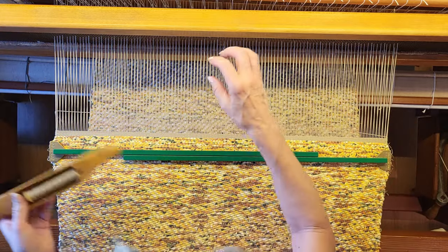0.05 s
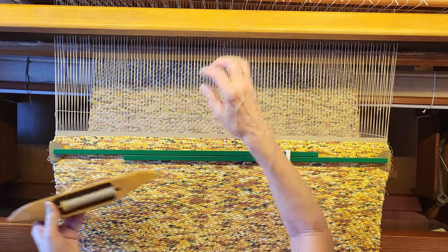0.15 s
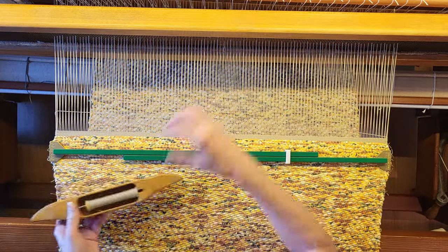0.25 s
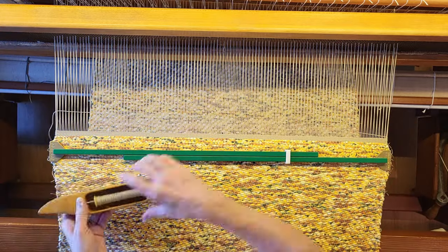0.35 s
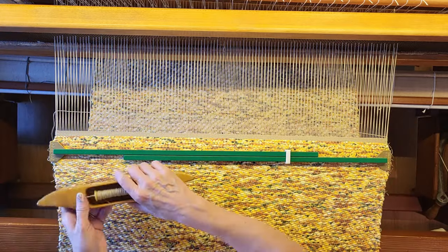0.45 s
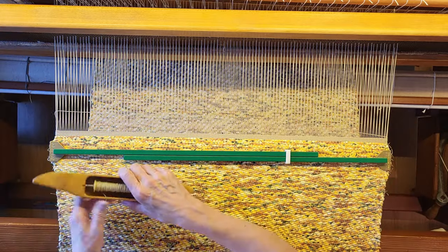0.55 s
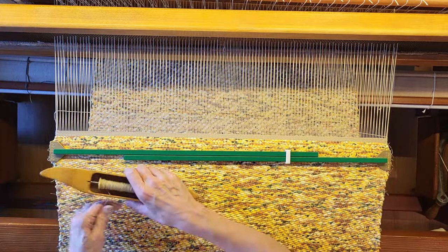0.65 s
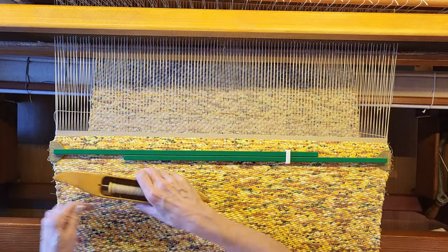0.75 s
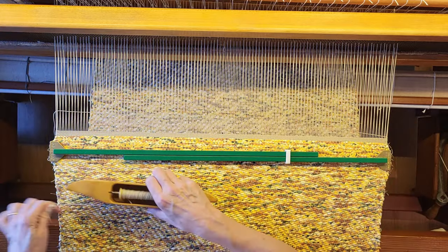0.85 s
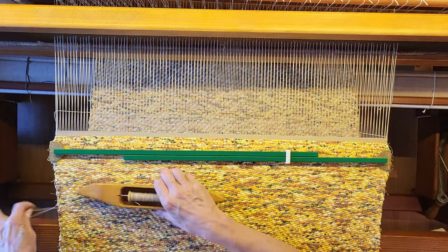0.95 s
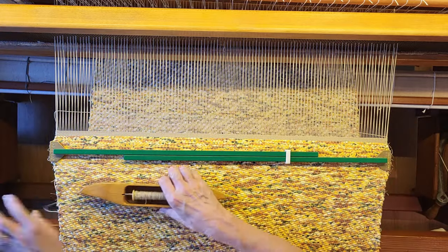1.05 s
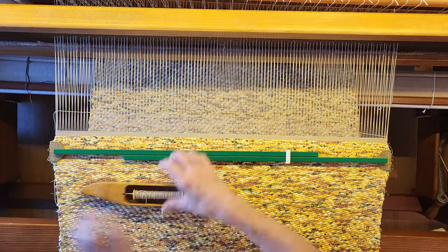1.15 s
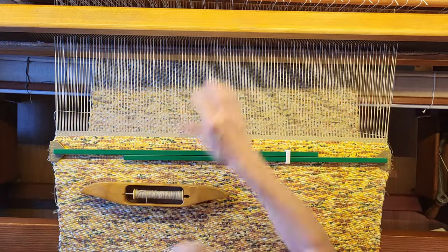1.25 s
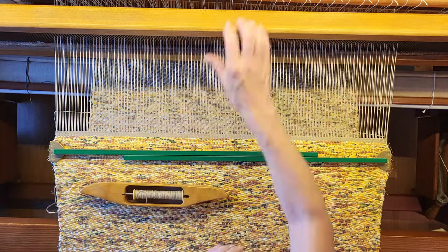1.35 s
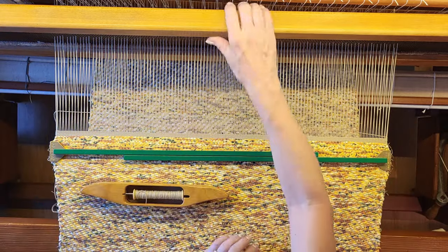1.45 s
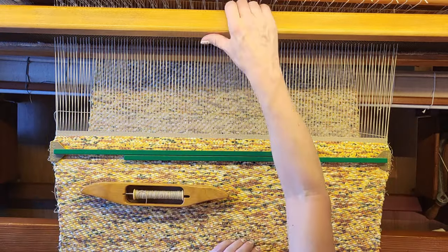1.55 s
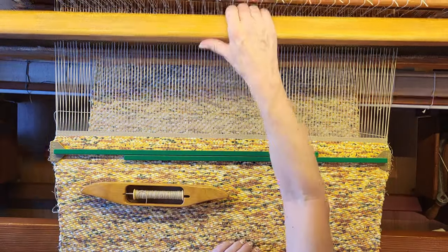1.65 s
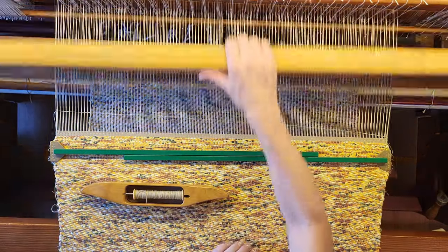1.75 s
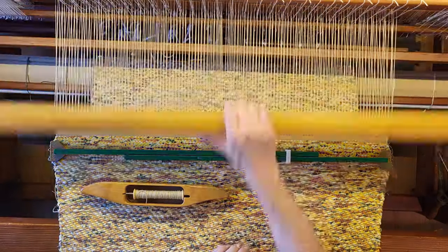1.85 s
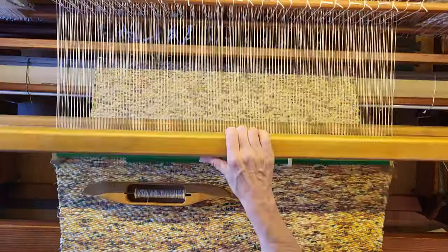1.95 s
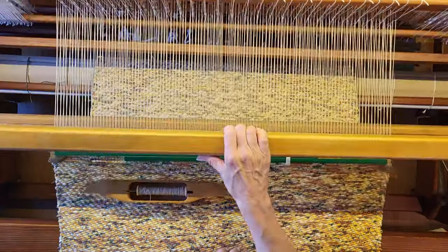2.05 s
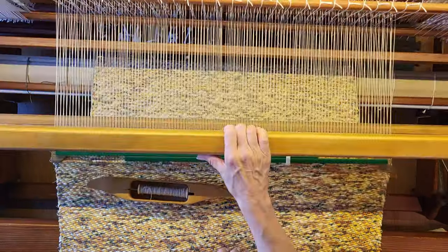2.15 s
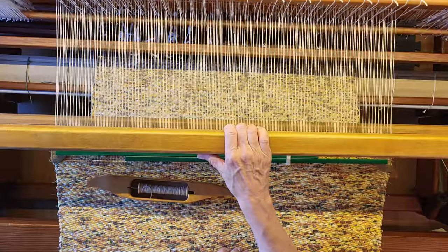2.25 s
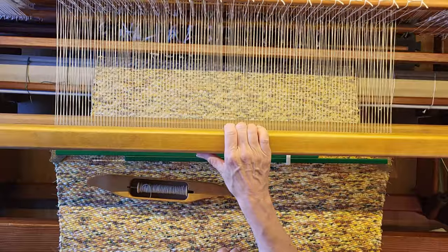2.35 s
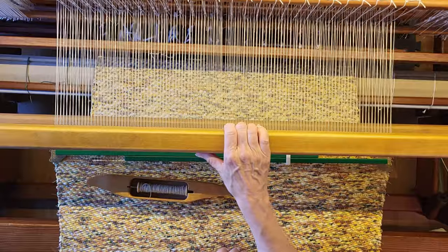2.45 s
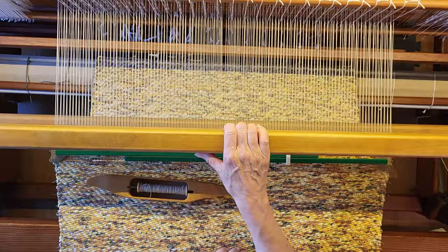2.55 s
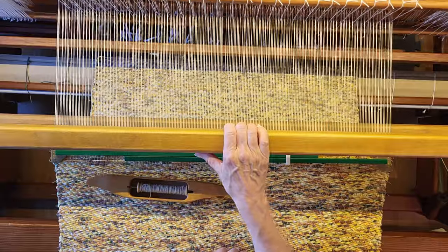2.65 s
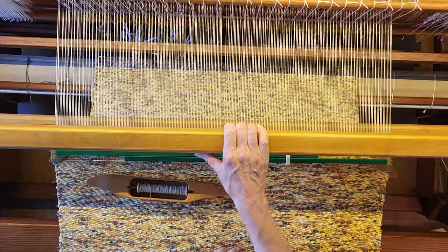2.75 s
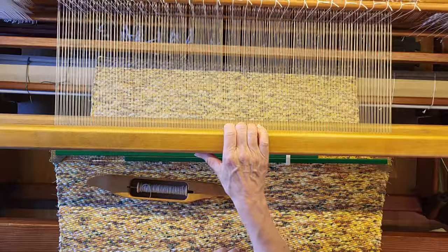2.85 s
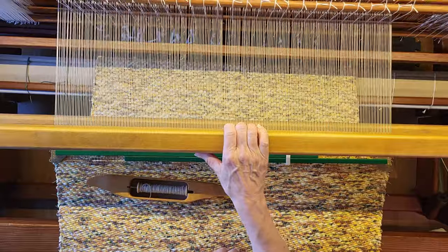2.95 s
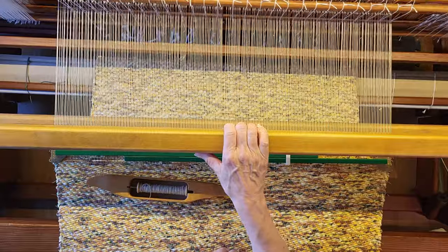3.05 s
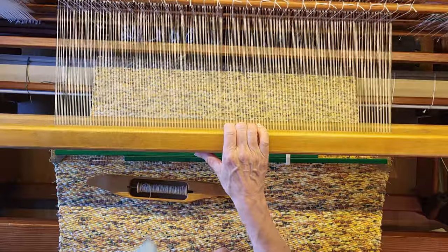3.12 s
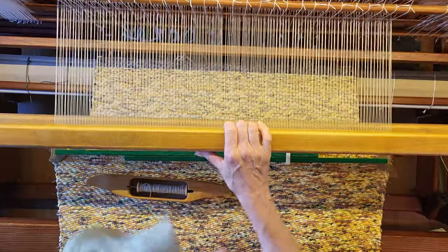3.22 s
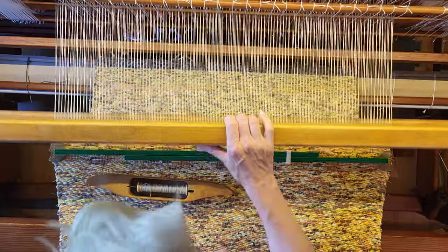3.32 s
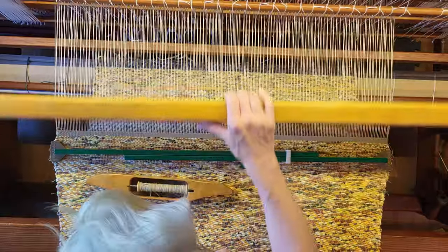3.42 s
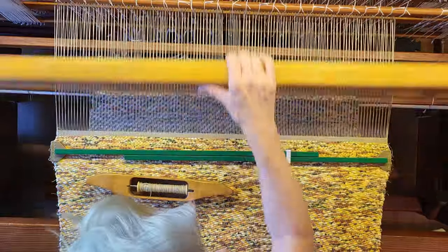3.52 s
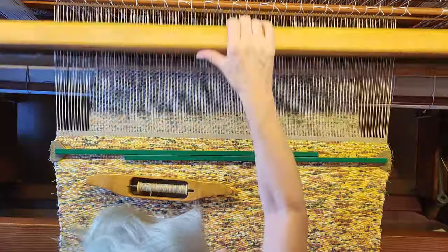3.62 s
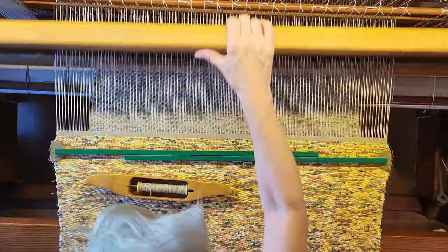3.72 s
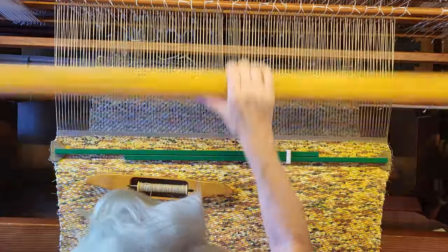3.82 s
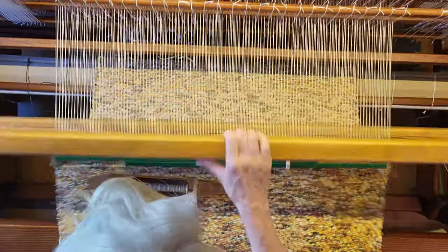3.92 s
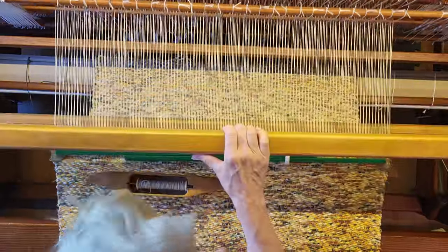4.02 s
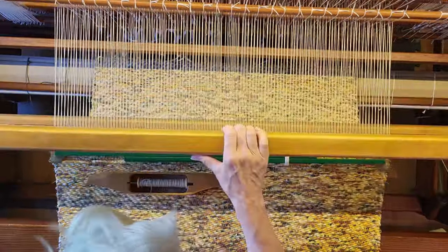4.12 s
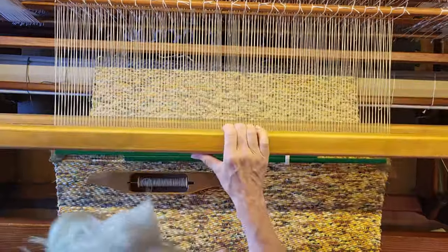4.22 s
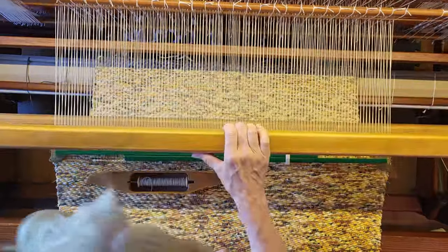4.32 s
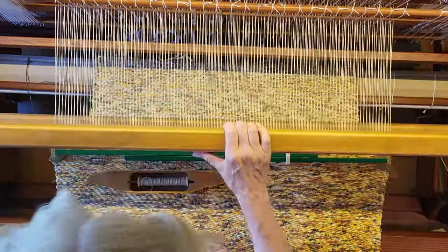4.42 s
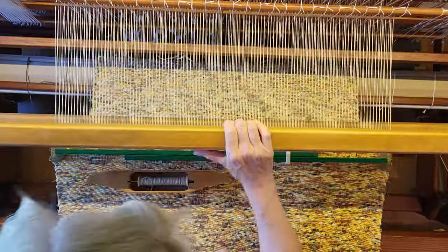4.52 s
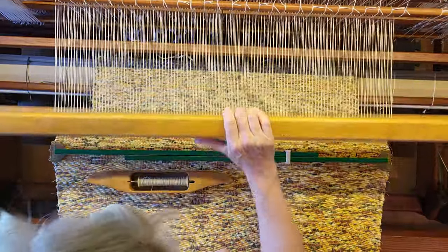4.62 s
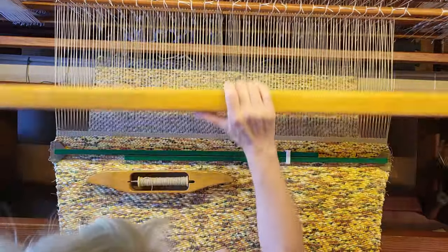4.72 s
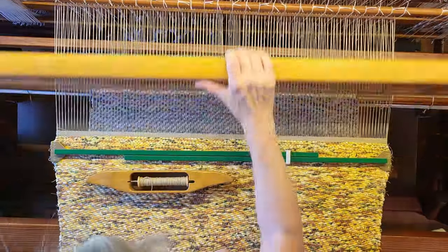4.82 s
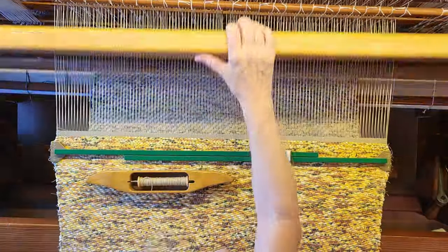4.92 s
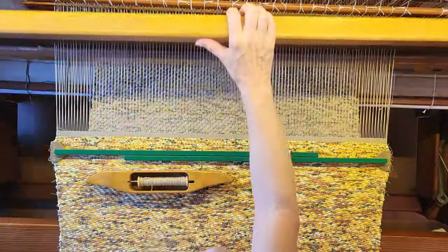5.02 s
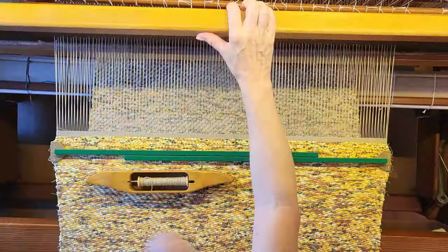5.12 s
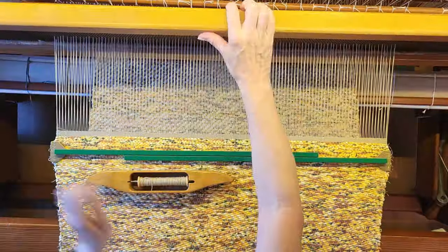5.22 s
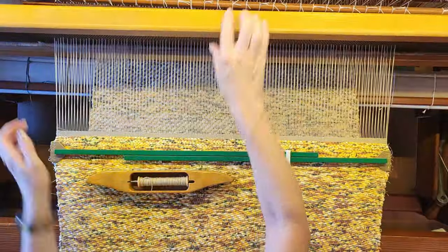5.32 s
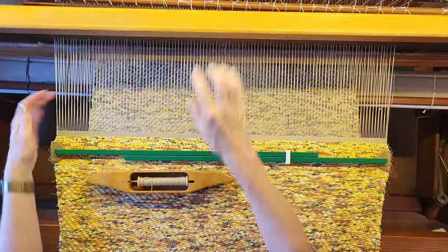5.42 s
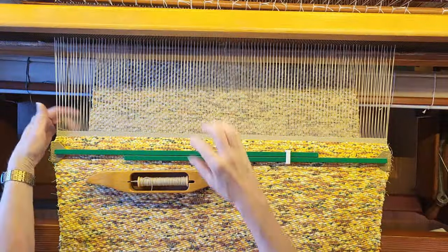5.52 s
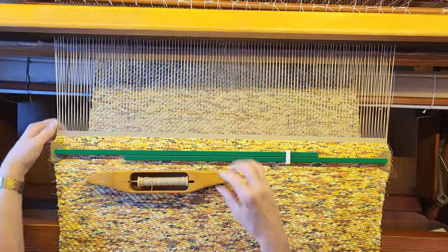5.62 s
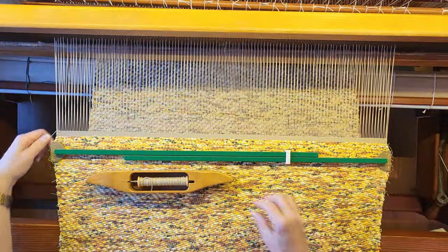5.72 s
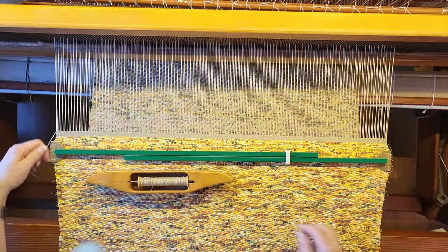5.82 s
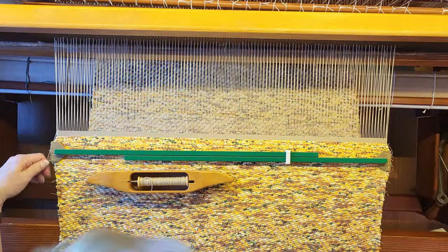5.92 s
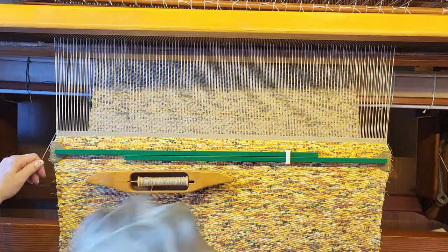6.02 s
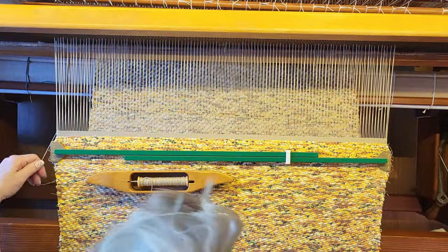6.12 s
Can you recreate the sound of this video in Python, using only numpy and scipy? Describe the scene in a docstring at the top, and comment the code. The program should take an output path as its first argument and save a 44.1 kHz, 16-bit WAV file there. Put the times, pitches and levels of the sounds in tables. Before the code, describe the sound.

Close stereo sound of a wooden floor loom in a small room, with short reflections and a very low hum in the air. After near silence, a bobbin knocks sharply in its hollow shuttle at about 0.45-0.5 seconds, then chatters lightly from 0.7 to 1.15. Small frame knocks and a hand brush follow around 1.4. A wooden clack and quick swish lead into a heavy, padded thud at 1.9; heddles rattle brightly, the reed ticks rapidly and the timber sways, fading by about 2.4. From 2.4 to 3.2 the shafts clack irregularly while threads rub. Deep knocks come at 3.3 and 3.7, then a second swish and rattling thud at 3.95, with ticks dying away. A knock at 4.55 precedes a soft slide and a deep, dull bump at 5.15 as the beater comes to rest. Faint brushing and a tiny knock near 5.95 end it.

```python
"""A bobbin clatters in the shuttle as it is caught and laid down by a wooden floor loom in a small room.
Then, twice, the reed swishes along the warp and the beater thuds into the cloth, rattling the whole loom.
Between the beats the treadles change the shed and the shafts clack; at last the beater swings back to rest.
Knocks are short noise chatters with resonances, thuds are decaying sine modes, and rubbing, swishes and
scrapes are streams of tiny noise grains; a faint hum and coloured noise lie beneath."""
import sys
import numpy as np
from scipy import signal
from scipy.fft import rfft, irfft
from scipy.io import wavfile
from scipy.ndimage import uniform_filter1d

SR = 44100
rng = np.random.default_rng(int(sys.argv[2]) if len(sys.argv) > 2 else 0)


def transcribe(u):
    """Save the signal u as a 16-bit wav file named by the first command-line argument.

    u: samples, shape (n,) or (channels, n), limited to [-1, 1]; the rate is SR.
    q: integer samples, one column per channel.
    """
    v = np.clip(np.atleast_2d(u).T, -1, 1)
    q = np.round(v * 32767).astype(np.int16)
    wavfile.write(sys.argv[1], SR, q)


N = 272097
TIME = np.arange(N) / SR
TAPS = 8192   # filter length in samples
FREQS = np.maximum(np.arange(TAPS // 2 + 1) * SR / TAPS, 1)

# Levels in the tables are mix settings, ahead of each layer's colour and gain.

# heavy parts knocking on the frame: [t/s, thud level/dB, contact time/ms, shaft clack level/dB]
FRAME_KNOCKS = [(1.001, -42.5, 0.77, -33.5), (1.079, -35, 0.96, -47), (1.455, -32.5, 1, -40),
                (1.712, -45.5, 0.14, -23), (3.309, -17.5, 1.18, -20), (3.414, -35, 0.46, -25),
                (3.676, -13.5, 3.6, -56), (4.557, -25.5, 1.1, -24), (5.151, -13.5, 4.7, -54),
                (5.195, -22, 3.4, -55), (5.95, -44, 1.4, -54.5)]
# the beater takes up its slack with this share of the swing to go; levels are over the beat's
SLACK_SHARE, SLACK_THUD_DB, SLACK_CONTACT_MS, SLACK_CLACK_DB = 0.485, -3, 0.69, -4.5


def frame_knocks():
    """All knocks on the frame, with the one in each swing where the beater takes up its slack."""
    slack = [(s - SLACK_SHARE * swing, db + SLACK_THUD_DB, SLACK_CONTACT_MS, db + SLACK_CLACK_DB)
             for s, db, _, swing, _ in BEATS]
    return list(FRAME_KNOCKS) + slack


# beater striking the cloth: [t/s, level/dB, crash length scale/s, swing before it/s, swish level/dB]
BEATS = [(1.92, -17, 0.24, 0.15, -45), (3.941, -17, 0.28, 0.11, -40)]
# every beat lands softly and rebounds twice: [delay/s, level over the beat/dB, contact time/ms]
BEAT_LANDING = [(.016, 13, 3.1), (.093, -1.5, 0.44), (.123, -4, .4)]


def blows():
    """Everything that shakes the frame, as [t/s, level/dB, contact time/ms]."""
    landings = [(s + delay, db + over_db, contact_ms)
                for s, db, *_ in BEATS for delay, over_db, contact_ms in BEAT_LANDING]
    return [(s, db, contact_ms) for s, db, contact_ms, _ in frame_knocks()] + landings


# ringing modes of the wooden frame: [f/Hz, level/dB, t60/s]
FRAME_MODES = [(39.2, -15.5, 0.23), (72.86, -7, 0.52), (94.3, 0.5, 0.21), (134.9, -12, 0.39),
               (177, -15, 0.1), (214, -10.5, 0.18), (301, -12, 0.19), (365.5, -4.5, 0.13),
               (422.4, -8, 0.23), (513, -6, 0.18), (585, -3.5, 0.024), (797, -11, 0.32)]
# broad colour of crunching timber joints: [f/Hz, level/dB]
TIMBER_COLOUR = [(60, -11), (130, -2.5), (270, 1), (400, 11), (560, 2.5), (680, -3), (850, -3), (1300, -12),
                 (2500, -26)]
# the upper modes vary from blow to blow in pitch (typical share) and in strength
MODE_SHIFT, MODE_SPREAD_DB, VARYING_ABOVE_HZ = 0.03, 4, 150
# softer blows swell more slowly
SWELL_S, SWELL_S_PER_CONTACT_MS = 0.0026, 0.0012


def frame():
    """Padded blows ring the frame's modes; the lowest beat, so thuds swell and throb while joints crunch."""
    out, strain = np.zeros((2, 2 * N)), np.zeros(2 * N)
    t = TIME[:SR]
    hz, mode_db, t60 = np.transpose(FRAME_MODES)
    signs = (-1) ** np.arange(len(hz))
    varies = hz > VARYING_ABOVE_HZ
    for s, db, contact_ms in blows():
        detuned = hz * (1 + MODE_SHIFT * varies * rng.standard_normal(len(hz)))
        rings = np.sin(2 * np.pi * detuned[:, None] * t) * from_db(-60 * t / t60[:, None])
        # a longer contact excites the high modes less
        softness = 1 / (1 + (np.pi * hz * contact_ms / 1000) ** 2)
        uneven_db = MODE_SPREAD_DB * varies * rng.standard_normal(len(hz))
        strengths = signs * softness * from_db(db + mode_db + uneven_db)
        swell = 1 - np.exp(-t / (SWELL_S + SWELL_S_PER_CONTACT_MS * contact_ms))
        start = int(s * SR)
        span = slice(start, start + SR)
        out[:, span] += strengths @ rings * swell
        strain[span] += from_db(db) * softness.mean() * swell * np.exp(-t / 0.048)
    crunch = from_db(-14) * body(noise() * strain[:N], TIMBER_COLOUR)
    return room(out[:, :N], wet_db=-3, delay=0.007) + crunch


# broad colours of the rattling heddles and of the swaying loom: [f/Hz, level/dB]
RATTLE_COLOUR = [(200, -8.5), (700, 2), (1200, 3), (2200, 0), (3500, 2.5), (4700, 3.5), (6300, -1),
                 (7400, 2.5), (8700, -12.5), (10200, -14.5), (13000, -5), (16000, -26)]
SWAY_COLOUR = [(15, -15.5), (35, -3), (60, 2.5), (85, 4), (130, -6), (250, -22.5), (1000, -59)]


def shaking():
    """After a beat the loose heddles rattle, the joints knock and the loom sways."""
    heddles = (agitation(rise=0.011, hold=0.89, tail_db=-12.5, tail_decay=0.28)
               * clatter(spread_db=3, decay=0.012, count=110))
    joints = (agitation(rise=0.036, hold=0.43, tail_db=3, tail_decay=0.13)
              * grains(per_s=99, spread_db=1.5, decay=0.0043))
    sway = agitation(rise=0.017, hold=0.5, tail_db=-3, tail_decay=0.22) * noise()
    rattle = room(from_db(-6) * body(heddles, RATTLE_COLOUR), wet_db=-11.5, delay=0.0023)
    return rattle + from_db(-7.5) * body(joints, TIMBER_COLOUR) + from_db(-2) * body(sway, SWAY_COLOUR)


def agitation(rise, hold, tail_db, tail_decay):
    """A beat keeps the loose parts bouncing for a while, then a tremor dies away."""
    out = 0
    for s, db, length, *_ in BEATS:
        t = np.clip(TIME - s, 0, 3)
        crash = np.exp(-(t / (hold * length)) ** 4)
        tremor = from_db(tail_db) * np.exp(-t / tail_decay)
        out = out + from_db(db) * (1 - np.exp(-t / rise)) * (crash + tremor)
    return out


def clatter(spread_db, decay, count):
    """Many loose parts, each with its own pitch, knock at random around each beat; mean level is even."""
    hits = []
    for start, *_ in BEATS:
        times = start + np.linspace(-0.02, 0.8, count) + rng.uniform(-0.008, 0.008, count)
        pitches = rng.permutation(np.geomspace(700, 8000, count))
        hits += [(s, spread_db * rng.standard_normal(), 0, decay, hz) for s, hz in zip(times, pitches)]
    knocks = contacts(hits, treble_db=0.5, bite=0.3, own_db=3, ring_db=13.5, ring_octaves=0.14)
    power = np.abs(uniform_filter1d(np.mean(knocks ** 2, axis=0), size=1100))
    return knocks / np.sqrt(power + 1e-4)


# the sharpest ticks of the reed: [t/s, level/dB]
REED_TICKS = [(2.022, -8), (2.0555, -8), (2.2202, -15.5), (2.3143, -30), (2.9053, -23.5), (2.965, -17),
              (4.0094, -6.5), (4.0727, -7.5), (4.3, -18), (4.349, -22.5), (4.3825, -23), (4.493, -24.5)]
# reed gliding back along the warp, or the warp slipping through it: [middle t/s, level/dB, half length/s]
WARP_SLIDES = [(1.57, -72, .12), (2.985, -45.5, 0.022), (3.675, -50, 0.059), (5.02, -60.5, 0.13)]
# broad colour of the reed: [f/Hz, level/dB]
REED_COLOUR = [(200, -10), (1000, -12), (3000, -3.5), (4800, 7.5), (7300, -3.5), (9500, -18.5),
               (13000, -17), (16000, -32)]
# resonances of the reed: [f/Hz, width/Hz, lift/dB]
REED_MODES = [(1550, 150, 7), (2600, 84, 11), (4470, 300, 2.3), (4870, 200, 1.7), (7560, 300, 3.5)]
# broad colour of the warp: [f/Hz, level/dB]
WARP_COLOUR = [(100, 10), (400, -0.5), (800, 6), (1300, -3), (2500, 1), (5000, 4), (7300, 6.5),
               (9700, -0.5), (13000, 4), (16000, -4)]
SHARP_TICK_S, SWISH_S = 0.0027, 0.053   # decay of a sharp tick, half length of a swing's swish


def reed():
    """The steel reed, close by and so nearly dry, ticks in its groove and swishes along the warp."""
    sharp = touches([(s, db, SHARP_TICK_S) for s, db in REED_TICKS],
                    treble_db=-2, treble_follows=0.62, modes=REED_MODES[2:4])
    bounces = touches(reed_bounces(spread_db=3, unevenness=0.05, count=15),
                      treble_db=-23, treble_follows=0.43, modes=REED_MODES[2:4])
    ticks = contacts(sharp + bounces, treble_db=12.5, bite=0.08, own_db=3, ring_db=0, ring_octaves=0.12)
    ticks = from_db(-6.5) * body(ticks, REED_COLOUR, REED_MODES)
    swings = [(s - swing, db, SWISH_S) for s, _, _, swing, db in BEATS]
    rubbed = grains(per_s=14000, spread_db=4, decay=0.0017) * strokes(list(WARP_SLIDES) + swings)
    swish = from_db(9.5) * body(rubbed, WARP_COLOUR)
    return swish + room(ticks, wet_db=-6, delay=0.008)


# the reed bounces in its groove after a beat, harder up to a peak, then dying away
BOUNCE_GAP_S, BOUNCE_PEAK_S, TICK_S = 0.037, 0.13, 0.0016
BOUNCE_DB, BOUNCE_SLOPE_DB_PER_S = 11.5, 56.5   # peak level over the beat, slope on either side


def reed_bounces(spread_db, unevenness, count):
    """A run of ticks after each beat, nearly regular, building up and dying away."""
    rows = []
    for s, db, *_ in BEATS:
        ages = BOUNCE_GAP_S * np.arange(count) * (1 + unevenness * rng.standard_normal(count))
        levels = db + BOUNCE_DB - BOUNCE_SLOPE_DB_PER_S * np.abs(ages - BOUNCE_PEAK_S)
        levels = levels + spread_db * rng.standard_normal(count)
        rows += [(s + age, level, TICK_S) for age, level in zip(ages, levels)]
    return rows


# bobbin knocking in the shuttle: [t/s, level/dB]
BOBBIN_KNOCKS = [(0.452, -40), (0.4691, -15), (0.4759, -8.5), (0.5022, -8), (0.715, -23), (0.7234, -13.5),
                 (0.7672, -16.5), (0.8303, -20), (0.854, -16), (0.8978, -19.5), (0.918, -17),
                 (0.9733, -14.5), (1.0081, -19), (1.0642, -26.5), (1.0918, -24), (1.1454, -21.5),
                 (1.261, -40), (1.324, -39.5)]
# broad colour of the hollow shuttle: [f/Hz, level/dB]
SHUTTLE_COLOUR = [(100, -36), (450, -9.5), (950, -18.5), (1400, -7.5), (2700, -0.5), (4300, 1.5), (5700, 5),
                  (7500, 1), (10000, -8), (13000, -4.5), (16000, -29)]
# resonances of the shuttle: [f/Hz, width/Hz, lift/dB]
SHUTTLE_MODES = [(1287, 45, 2.1), (1517, 91, 18.2), (2106, 26, 10), (2680, 390, 9.4), (2830, 42, 1.6),
                 (3760, 130, 4.6), (5030, 52, 2.8), (5920, 180, 7.5), (5500, 79, 12), (7140, 200, 9)]
BOBBIN_CHATTER_S = 0.0092


def shuttle():
    """The bobbin knocks about on its spindle in the hollow shuttle."""
    hits = touches([(s, db, BOBBIN_CHATTER_S) for s, db in BOBBIN_KNOCKS],
                   treble_db=-5, treble_follows=0.83, modes=SHUTTLE_MODES)
    knocks = contacts(hits, treble_db=3, bite=0.19, own_db=2.5, ring_db=4, ring_octaves=0.26)
    return from_db(-10) * room(body(knocks, SHUTTLE_COLOUR, SHUTTLE_MODES), wet_db=-0.5, delay=0.0013)


# the clearest clacks of the shafts: [t/s, level/dB, chatter decay/s]
SHAFT_CLACKS = [(1.3775, -41.5, 0.018), (2.3876, -33, 0.0069), (2.4486, -36, 0.016),
                (2.5394, -29.5, 0.0054), (2.6313, -31.5, 0.016), (2.6776, -24, 0.012),
                (2.829, -32.5, 0.0098), (2.9292, -24, 0.017), (3.0548, -33, 0.025), (3.1081, -18.5, 0.012),
                (3.1488, -21.5, 0.009), (3.351, -26.5, 0.014), (4.1196, -14, 0.011), (4.6588, -42.5, 0.022)]
# broad colour of the shafts: [f/Hz, level/dB]
SHAFT_COLOUR = [(100, -8), (400, 5), (900, -8.5), (2000, 2), (3200, -1), (4600, -3.5), (7000, -7.5),
                (9500, -31), (13000, -28), (16000, -25)]
# resonances of the shafts: [f/Hz, width/Hz, lift/dB]
SHAFT_MODES = [(1227, 30, 11.2), (1491, 53, 9.4), (2078, 150, 5.7), (2906, 650, 6), (3760, 340, 7.8),
               (4580, 140, 9.5)]
# chatter decay of a jolt; clack at the instant of a beat, over the beat's level
KNOCK_CHATTER_S, BEAT_JOLT_DB = 0.01, 0.5


def shafts():
    """Light wooden bars clack deep inside the loom; knocks and beats jolt them with a lower ring."""
    shocks = [(s, db) for s, _, _, db in frame_knocks()] + [(s, db + BEAT_JOLT_DB) for s, db, *_ in BEATS]
    jolts = touches([(s, db, KNOCK_CHATTER_S) for s, db in shocks],
                    treble_db=-10.5, treble_follows=0.25, modes=SHAFT_MODES[2:4])
    clacks = touches(list(SHAFT_CLACKS) + loose_clacks(spread_db=3, count=3),
                     treble_db=-7.5, treble_follows=0.2, modes=SHAFT_MODES[3:5])
    knocks = contacts(jolts + clacks, treble_db=8.5, bite=0.22, own_db=1.5, ring_db=1.5, ring_octaves=0.23)
    return from_db(-3) * room(body(knocks, SHAFT_COLOUR, SHAFT_MODES), wet_db=-2.5, delay=0.0017)


# treadle pushes that change the shed: [middle t/s, level/dB, half length/s]
TREADLE_PUSHES = [(2.666, -42.5, 0.09), (3.023, -41, 0.1), (3.256, -53, 0.41)]
LOOSE_CLACK_DB, LOOSE_CHATTER_S = 14, 0.008   # lighter clacks: level over the push, decay


def loose_clacks(spread_db, count):
    """Each treadle push jostles the shafts at random moments."""
    rows = []
    for s, db, half in TREADLE_PUSHES:
        for k in range(count):
            moment = s + half * (2 * (k + rng.random()) / count - 1)
            level = db + LOOSE_CLACK_DB + spread_db * rng.standard_normal()
            rows.append((moment, level, LOOSE_CHATTER_S))
    return rows


# broad colour of rubbing threads: [f/Hz, level/dB]
THREAD_COLOUR = [(40, 9), (75, 16.5), (200, -7.5), (400, 7), (1000, 1), (2000, -2), (3500, -2.5),
                 (6000, -5.5), (9500, -21.5), (13000, -15.5), (16000, -25.5)]
# each knock drags the threads: level over its clack, half length, delay
SCUFF_DB, SCUFF_S, SCUFF_LAG_S = -24, 0.03, 0.015


def rubbing():
    """Threads rub as the shafts trade places and scuff at each knock."""
    scuffs = [(s + SCUFF_LAG_S, db + SCUFF_DB, SCUFF_S) for s, _, _, db in frame_knocks()]
    rubs = strokes(list(TREADLE_PUSHES) + scuffs) * grains(per_s=700, spread_db=3.5, decay=0.0044)
    return from_db(3) * body(rubs, THREAD_COLOUR)


# hands brushing wood and cloth: [middle t/s, level/dB, half length/s]
HAND_RUBS = [(1.44, -42.5, 0.033), (4.7, -57.5, 0.57), (5.19, -50, 0.057), (5.5, -72, 0.077),
             (5.67, -59.5, 0.033), (5.955, -53.5, 0.037)]
# broad colour of the hands: [f/Hz, level/dB]
HAND_COLOUR = [(40, 0.5), (75, 13), (140, 14.5), (200, 2.5), (290, 11.5), (450, 5.5), (800, -2.5),
               (1400, 2), (2300, -3.5), (3800, -5), (6500, -17), (9500, -27.5), (16000, -21.5)]


def hands():
    """Hands brush the beater and the cloth with a dull scrape."""
    scrape = strokes(HAND_RUBS) * grains(per_s=2100, spread_db=6, decay=0.0089)
    return from_db(-1.5) * body(scrape, HAND_COLOUR)


# broad colour of the room air: [f/Hz, level/dB]
AIR_COLOUR = [(15, -55.5), (25, -37.5), (48, -11), (70, -2.5), (123, -9.5), (175, -9.5), (206, -16.5),
              (988, -45), (1400, -37.5), (4370, -40.5), (7310, -38), (10000, -49.5), (13000, -45.5),
              (16000, -52.5)]
# steady tones of the hum and the whine: [f/Hz, rms level/dB]
HUM_TONES = [(59.5, -62), (91.5, -68.5), (173, -66.5), (1733, -90)]


def background():
    """Quiet room air, as coloured noise, with a low hum and a faint whine of steady sines."""
    hum = sum(np.sqrt(2) * from_db(db) * np.sin(2 * np.pi * (hz * TIME + rng.random()))
              for hz, db in HUM_TONES)
    return from_db(-60) * body(noise(), AIR_COLOUR) + hum


# reverberation time of the room: [f/Hz, t60/s]
ROOM_DECAY = [(100, 0.45), (500, 0.26), (1500, 0.24), (4000, 0.22), (12000, 0.13)]


def room(x, wet_db, delay):
    """Diffuse reflections build up over a short delay (s) and die sooner in the treble."""
    t, tail = TIME[:SR // 2], 0
    edges = np.geomspace(140, 19000, 9)
    for low, high in zip(edges, edges[1:]):
        bandpass = signal.butter(2, [low, high], "band", fs=SR, output="sos")
        band = signal.sosfilt(bandpass, rng.standard_normal((2, len(t))))
        tail = tail + band * from_db(-60 * t / at_hz(ROOM_DECAY, np.sqrt(low * high)))
    tail = tail * (1 - np.exp(-(t / delay) ** 2))
    return x + from_db(wet_db) * convolve(x, tail / np.linalg.norm(tail[0]))


def touches(rows, treble_db, treble_follows, modes):
    """Colours [t/s, level/dB, decay/s] rows: softer is duller, and each favours a resonance by chance."""
    hardest = max(db for _, db, _ in rows)
    rings = rng.choice([hz for hz, *_ in modes], len(rows))
    return [(s, db, treble_db + treble_follows * (db - hardest), decay, hz)
            for (s, db, decay), hz in zip(rows, rings)]


def contacts(hits, treble_db, bite, own_db, ring_db, ring_octaves):
    """Each touch is a short chatter, coloured by the spot where it lands; long ones start softly."""
    out, t = np.zeros((2, 2 * N)), TIME[:SR // 8]
    treble = np.clip(np.log2(FREQS / 2500) / 2, -0.3, 1.1)
    spots = np.arange(0, SR / 2, 220)   # Hz, points of each touch's random ripple
    for s, db, bright_db, decay, ring_hz in hits:
        age = t / max(decay, 1e-4)
        burst = rng.standard_normal((2, len(t))) * np.exp(-age) * (1 - np.exp(-age / bite))
        ring = ring_db / (1 + (np.log2(FREQS / ring_hz) / ring_octaves) ** 2)
        ripple = own_db * np.interp(FREQS, spots, rng.standard_normal(len(spots)))
        response = causal((bright_db + treble_db) * treble + ring + ripple)[:TAPS // 8]
        knock = signal.fftconvolve(burst, [response], axes=1)[:, :len(t)]
        start = int(s * SR)
        out[:, start:start + len(t)] += from_db(db) * knock
    return out[:, :N]


def strokes(rows, steepness=2.4):
    """Each stroke gathers level, glides and fades again."""
    return sum(from_db(db) * np.exp(-np.minimum(np.abs((TIME - s) / half), 4) ** steepness)
               for s, db, half in rows)


def grains(per_s, spread_db, decay):
    """A stream of tiny contacts of uneven strength, with a steady mean power."""
    sizes = from_db(spread_db * np.minimum(rng.exponential(1, N), 3)) ** 2
    impulses = sizes * (rng.random(N) < per_s / SR) + 1e-6
    power = signal.lfilter([1], [1, -np.exp(-2 / (decay * SR))], impulses)
    return noise() * np.sqrt(power / uniform_filter1d(power, size=2200))


def noise():
    """White noise, unrelated on the two sides."""
    return rng.standard_normal((2, N))


def body(x, colour, modes=()):
    """A broad colour with resonances standing out of it; keeps the power of white noise."""
    lift = 1 + sum((from_db(db) ** 2 - 1) / (1 + (2 * (FREQS - hz) / width) ** 2)
                   for hz, width, db in modes)
    response = causal(at_hz(colour, FREQS) + 10 * np.log10(np.maximum(lift, 0.1)))
    return convolve(x, response / np.linalg.norm(response))


def causal(curve_db):
    """Minimum-phase impulse response with the given gain curve, by folding its cepstrum."""
    cepstrum = irfft(np.log(from_db(curve_db)))
    cepstrum[1:TAPS // 2] *= 2
    cepstrum[TAPS // 2 + 1:] = 0
    return irfft(np.exp(rfft(cepstrum)))


def convolve(x, response):
    """Pass a signal through an impulse response."""
    return signal.oaconvolve(x, np.atleast_2d(response), axes=1)[:, :N]


def at_hz(points, hz):
    """Read a table on a log-frequency axis."""
    f, value = np.transpose(points)
    return np.interp(np.log(hz), np.log(f), value)


def from_db(db):
    """Decibels to gain."""
    return 10 ** (np.asarray(db) / 20)


# gain of the stereo difference: [f/Hz, level/dB]
SIDE_GAIN = [(60, -19.5), (180, -13.5), (350, -12.5), (700, -2.5), (1300, 0), (3000, -1), (15000, 1)]
# balance, left over right: [f/Hz, level/dB]
LEFT_LEAN = [(100, 1.7), (1400, -0.4), (2800, 0.5), (5500, -4), (9500, -2), (13500, -7)]


def scene():
    """All layers in close stereo: nearly alike in the bass, with the upper treble leaning right."""
    loom = shuttle() + shafts() + reed() + frame() + shaking()
    left, right = loom + rubbing() + hands() + background()
    side = convolve([(left - right) / 2], causal(at_hz(SIDE_GAIN, FREQS)))
    pair = (left + right) / 2 + side * [[1], [-1]]
    lean_db = at_hz(LEFT_LEAN, FREQS) / 2
    return convolve(pair, [causal(lean_db), causal(-lean_db)])


CUTOFF_HZ = 16200


def record(dry):
    """The top is cut steeply by an elliptic low-pass."""
    lowpass = signal.ellip(10, 0.1, 80, CUTOFF_HZ, fs=SR, output="sos")
    return signal.sosfilt(lowpass, dry)


dry = scene()
out = record(dry)
transcribe(out)
```